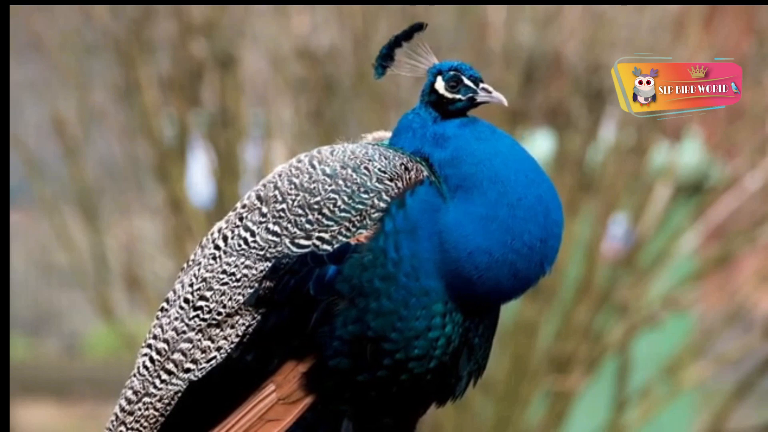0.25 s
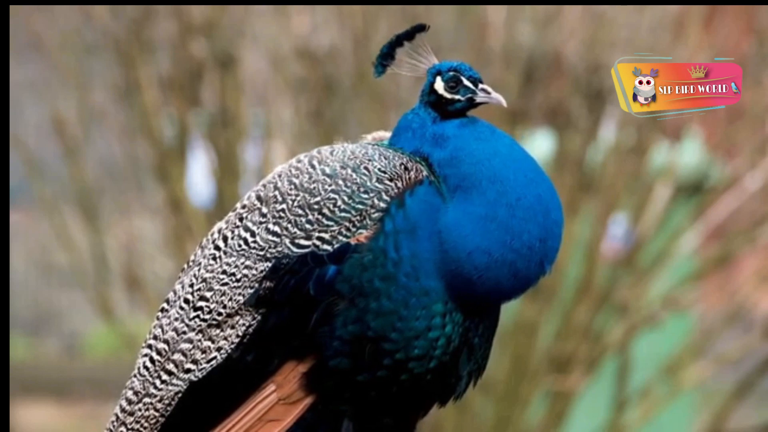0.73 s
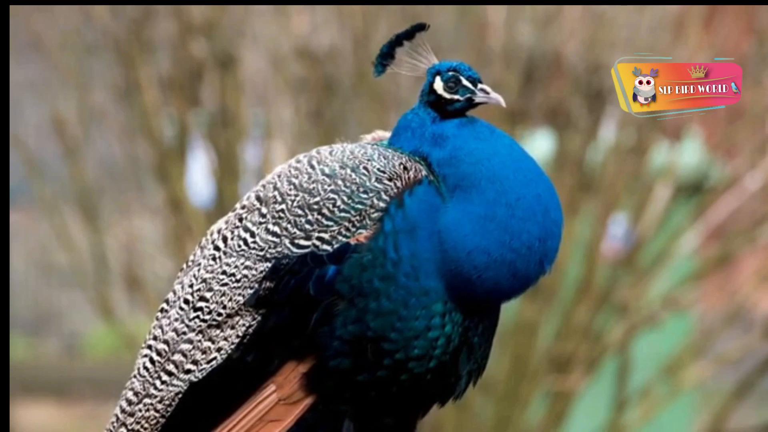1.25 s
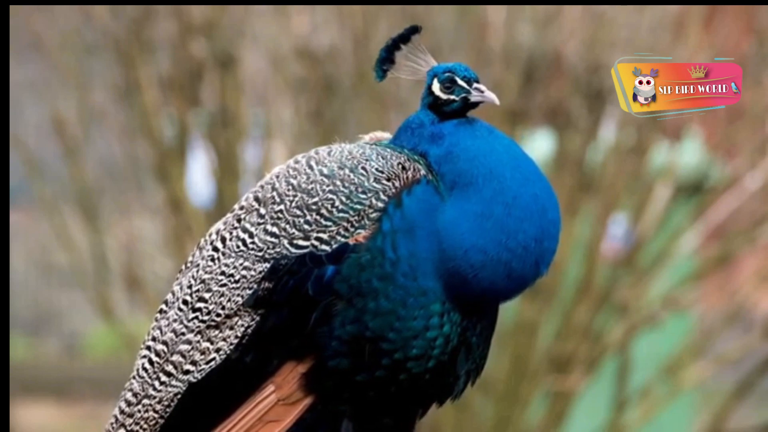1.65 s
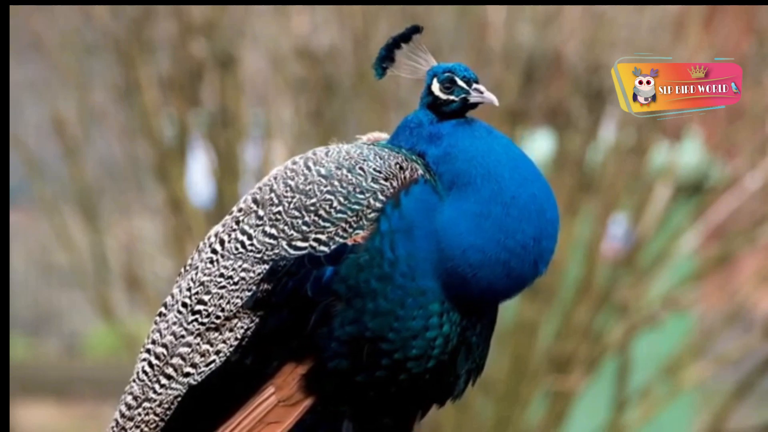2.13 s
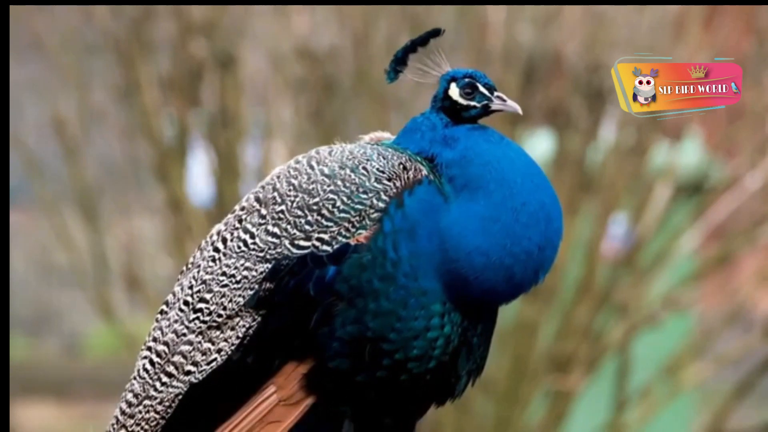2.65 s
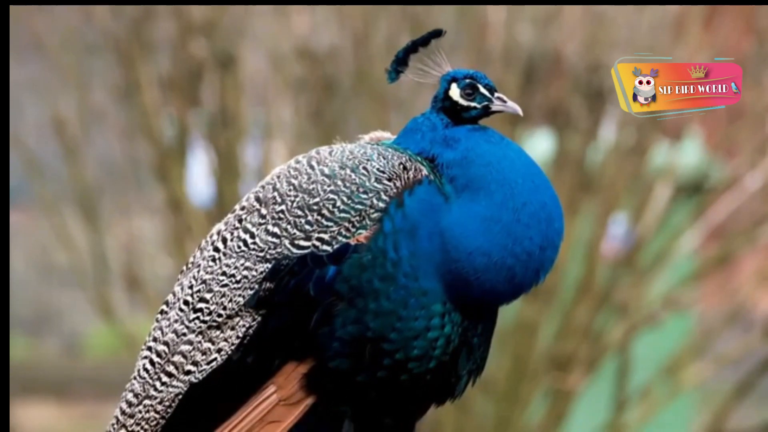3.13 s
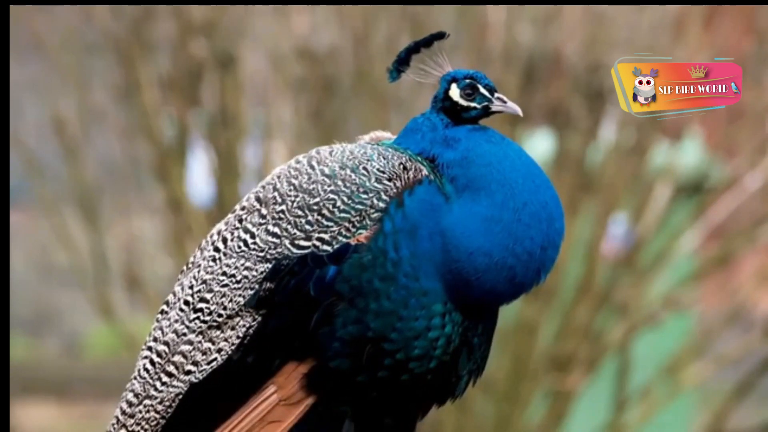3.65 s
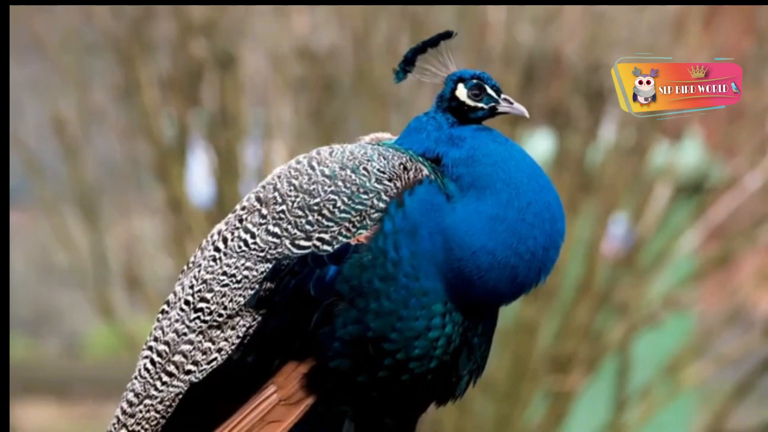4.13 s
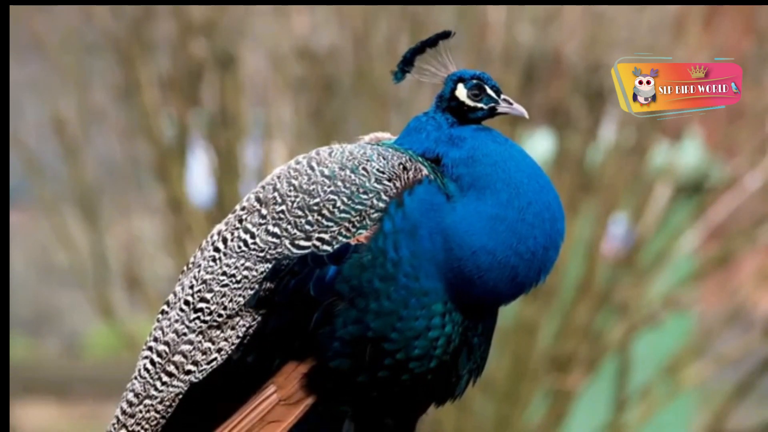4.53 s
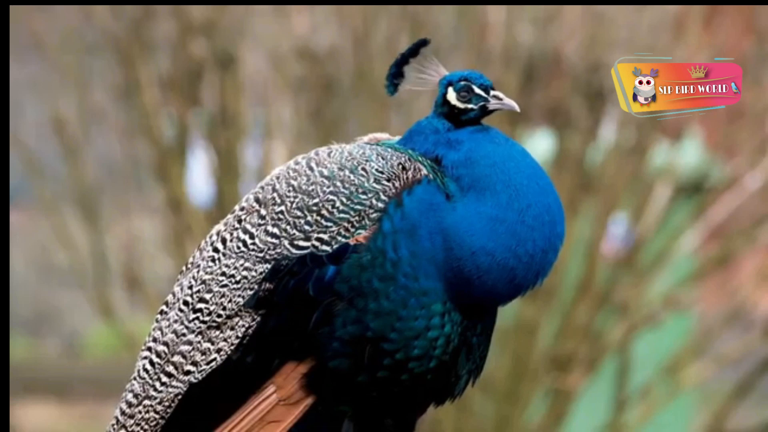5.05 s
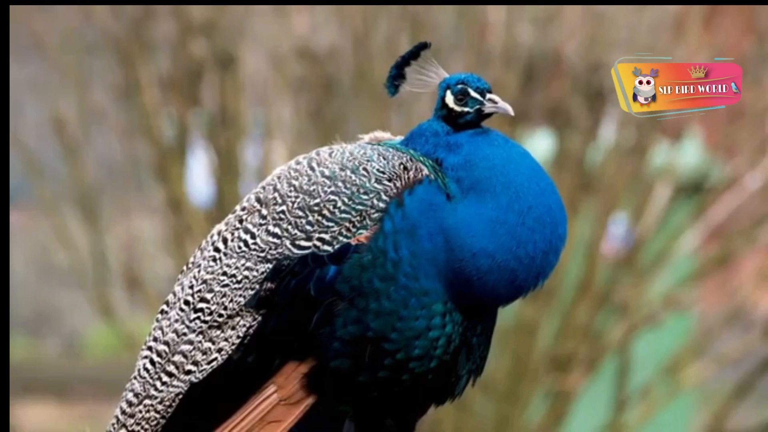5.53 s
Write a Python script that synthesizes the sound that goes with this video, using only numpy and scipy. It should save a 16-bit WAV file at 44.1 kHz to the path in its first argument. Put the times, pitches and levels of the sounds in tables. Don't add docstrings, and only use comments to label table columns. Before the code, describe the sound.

A peacock outdoors wails loudly, gives one short hoarse honk, then wails again, before an abrupt cut to quieter garden air with insects and faint birds.

```python
import sys
import numpy as np
from scipy import signal
from scipy.fft import rfft, irfft, next_fast_len
from scipy.io import wavfile
from scipy.ndimage import uniform_filter1d, map_coordinates

SR = 44100
rng = np.random.default_rng(int(sys.argv[2]) if len(sys.argv) > 2 else 0)


def gain_from_db(level_db):
    decades = np.asarray(level_db, float) / 20
    return 10 ** decades


def wav_out(sig):
    wavfile.write(sys.argv[1], SR, np.round(np.clip(np.atleast_2d(sig).T, -1, 1) * 32767).astype(np.int16))


N = 254898


def unit(x):
    return x / np.sqrt(np.mean(x ** 2) + 1e-20)


def along(points, hz):
    f, value = np.transpose(points)
    return np.interp(np.log(hz + 1), np.log(f + 1), value)


def curves(rows, t):
    s, *columns = np.transpose(rows)
    return [np.interp(t, s, column) for column in columns]


def wobble(rate, count):
    knots = rng.standard_normal(int(count * rate / SR) + 4)
    return map_coordinates(knots, [np.arange(count) * rate / SR])


def filtered(x, response):
    size = next_fast_len(x.shape[-1] + 8192)
    spectrum = rfft(x, size) * response(np.fft.rfftfreq(size, 1 / SR))
    return irfft(spectrum, size)[..., :x.shape[-1]]


def add(mix, s, sound, pan_db=0):
    room = mix[:, round(s * SR):]
    panned = sound * gain_from_db([[pan_db / 2], [-pan_db / 2]])
    room[:, :sound.shape[-1]] += panned[:, :room.shape[1]]


# f/Hz, level/dB
AIR_FIRST = [(20, -24), (60, -4), (150, -8.5), (200, -1), (250, -6), (500, -8.5), (1200, -11.5),
             (2000, -14), (3200, -19), (5500, -13), (8500, -15), (10500, -12.5), (11500, -25), (15200, -32)]
# f/Hz, level/dB
AIR_AFTER = [(20, -28), (60, -4), (200, -4), (700, -4.5), (1700, -8), (2200, -15), (4000, -13), (6000, -12),
             (8500, -5.5), (10300, 0.5), (11200, -24), (13000, -21), (15200, -45.5)]
# t/s, level/dB
AIR_LEVEL = [(0, -53), (1, -52.5), (1.5, -53), (2, -50), (2.3, -54), (2.7, -54.5), (3.1, -58), (3.5, -54),
             (3.93, -56), (3.95, -59), (5.78, -62.5)]
# f/Hz, correlation [0-1]
ALIKE = [(25, .75), (60, .94), (120, .99), (300, .95), (600, .93), (1000, .5), (2000, .15), (15000, .1)]
# f/Hz, left-right level/dB
AIR_PAN = [(300, 0), (1500, -4.5), (3000, 0), (6300, -4.5), (9000, 7), (11500, 4), (14000, -11)]


def air(spectrum):
    def angle(hz):
        return np.arccos(np.clip(along(ALIKE, hz), -1, 1)) / 2

    def mid_side(hz):
        return gain_from_db(along(spectrum, hz)) * [np.cos(angle(hz)), np.sin(angle(hz))]

    def lean(hz):
        return gain_from_db(along(AIR_PAN, hz) * np.array([[.5], [-.5]]))

    mid, side = filtered(rng.standard_normal((2, N)), mid_side)
    pair = filtered(np.array([mid + side, mid - side]), lean)
    level_db = curves(AIR_LEVEL, np.arange(N) / SR)[0] + .8 * wobble(2.4, count=N)
    return gain_from_db(level_db) * unit(pair)


# t/s, level/dB, stroke rate/Hz
CICADA = [(0, -56.5, 146), (1, -57.5, 145), (2.1, -58, 146.9), (2.4, -60, 145), (3.8, -60.5, 145.2),
          (4.24, -59.5, 143.3), (4.27, -75, 139.7), (4.41, -66.5, 141.4), (4.45, -62.5, 147.8),
          (4.7, -59.5, 150.8), (5.2, -60, 145), (5.62, -59.5, 144.7), (5.64, -75, 160), (5.78, -72, 160)]


def cicada():
    db, rate = curves(CICADA, np.arange(N) / SR)
    stroke = np.cumsum(rate) / SR % 1
    shape = np.sin(np.pi * stroke ** 2.0) ** 3.6 * gain_from_db(1.5 * wobble(340, count=N))
    hz = 11100 - 1600 * stroke + 150 * wobble(770, count=N)
    buzz = unit(shape * np.sin(2 * np.pi * np.cumsum(hz) / SR))
    blur = filtered(rng.standard_normal((2, N)), lambda f: 1 / (1 + ((f - 9900) / 600) ** 2) ** 2.0)
    pair = np.array([np.roll(buzz, 5), buzz])
    return gain_from_db(db + [[3.5], [-7]]) * (pair + 0.55 * unit(blur))


# t/s, level/dB
CRICKET = [(0, -65), (1.7, -78), (2.05, -63.5), (2.5, -73.5), (3.94, -73.5), (4.5, -86.5), (5.78, -86.5)]


def cricket():
    t = np.arange(N) / SR
    train = np.clip(3 * np.sin(2 * np.pi * 4.6 * t) + 1.5, 0, 1)
    pulses = np.clip(np.sin(2 * np.pi * 68 * t), 0, 1)
    tone = np.sin(2 * np.pi * 6400 * t + .8 * wobble(197, count=N))
    return gain_from_db(curves(CRICKET, t)[0] + [[-2], [5]]) * unit(train * pulses * tone)


# f/Hz, level/dB
EARLIER = [(1324, -54.5), (1986, -49.5), (3295, -63.5), (3951, -60.5), (5297, -59.5), (5954, -64.5)]


def earlier_call():
    t = np.arange(N) / SR
    return sum(gain_from_db(db + 4.5 - 60 * t / .6) * np.sin(2 * np.pi * f * t) for f, db in EARLIER)


def whistles(rows, pan_db):
    mix = np.zeros((2, N))
    for s, length, from_hz, to_hz, db in rows:
        u = np.linspace(0, 1, round(length * SR))
        hz = from_hz + (to_hz - from_hz) * u
        slide = np.sin(np.pi * u) * np.sin(2 * np.pi * np.cumsum(hz) / SR)
        add(mix, s, gain_from_db(db + 6.5) * slide, pan_db)
    return mix


# t/s, length/s, from f/Hz, to f/Hz, level/dB
FINCHES = [(.03, 0.041, 5680, 4950, -60), (1.162, 0.091, 7240, 7400, -64), (1.906, .044, 3950, 4530, -63),
           (1.93, 0.081, 4410, 5660, -57.5), (3.974, 0.039, 6600, 5800, -66.5),
           (4.158, .034, 7000, 5760, -72), (4.39, .04, 4400, 4430, -78), (4.55, 0.044, 4890, 5000, -80),
           (4.539, .098, 1920, 2150, -80), (4.619, .03, 3600, 3280, -74.5),
           (4.782, 0.053, 4750, 4630, -78.5), (5.65, 0.038, 3510, 3300, -77)]


def finches():
    return whistles(FINCHES, 0)


def glide(t, note, arc):
    start, end, settled_hz, flat_hz, rasp = note
    leap_s, leap_hz, slow, sag_s, sag = arc
    settling = flat_hz * np.exp(-(t - start) / .026)
    since, fast_s = np.clip(t - leap_s, 0, None), .04
    leap = 1 - (1 - slow) * np.exp(-since / fast_s) - slow * np.exp(-since / (4 * fast_s))
    knee = 0.039 * (end - start)
    sagging = sag * knee * np.logaddexp(0, (t - sag_s) / knee)
    pitch = settled_hz - settling + leap_hz * leap - sagging
    calm = 0.018
    locking = rasp * np.exp(-(t - start) / .035)
    slip = .08 * leap_hz / 220 * np.exp(-((t - leap_s - 0.06) / .04) ** 2)
    letting_go = 0.1023 * np.exp((t - end) / .03)
    return pitch, np.clip(calm + locking + slip + letting_go, 0, 1)


def resonances(rows, posture, hz):
    power = sum(gain_from_db(db[posture]) ** 2 / (1 + ((hz - centre) / width) ** 2) ** 1.495
                for centre, width, *db in rows)
    return np.sqrt(power)


# f/Hz, width/Hz, level/dB
BREATH = [
    (1510, 890, -11),
    (3855, 2100, -5.5),
    (6200, 900, -1.5),
    (9100, 1900, 3),
]


def breath(turn, levels):
    puffs = rng.standard_normal(len(turn)) + .3 * rng.standard_normal((2, len(turn)))
    puffs = puffs * (1.1 + np.cos(turn))
    total = 0
    for (hz, width, db), level in zip(BREATH, levels):
        ring = filtered(puffs, lambda f: 1 / (1 + ((f - hz) / width) ** 2) ** 2)
        total = total + level * gain_from_db(db) * unit(ring)
    return total


# f/Hz, width/Hz, level/dB in each call's posture (three columns)
WINDPIPE = [(799.3, 34, -6.5, -12, -24.5), (1638.5, 117.2, -0.17, -0.9, -0.26), (2085, 74, -7, -1.3, -5.5),
            (2513, 78, -7, -16, -10.5)]
# f/Hz, width/Hz, level/dB in each call's posture (three columns)
THROAT = [(3278, 590, -1.74, 0, -9.5), (4365, 130, -10.5, 10.5, -5.5), (4884, 100, -2.2, -0.5, -9),
          (5715, 190, -5, 2, 1.5), (5990, 92, 4, -6.5, -11.5), (6580, 210, 5, 10.5, 4),
          (8270, 480, 4.5, 5.5, -0.9), (9710, 212, -3.5, -3, 4), (10800, 357, -6.5, -13.5, -3.5),
          (11620, 429, -22.5, -26.5, -13), (13228, 580, -33, -33.5, -19.5)]
# f/Hz, left lead/rad
LEAD = [(500, 0), (900, .03), (1500, -.6), (2200, -.35), (3500, -.8), (4400, -.6), (6200, -.3), (8200, -.6),
        (9500, -1.2), (12500, -1.9), (15000, -.5)]


def call(note, arc, effort, posture, facing):
    t = np.arange(note[0], note[1], 1 / SR)
    pitch, hoarse = glide(t, note, arc)
    pitch = uniform_filter1d(pitch, 300)
    effort_db, squeeze_db, opening = curves(effort, t)
    turn = 2 * np.pi * np.cumsum(pitch * (1 + 0.074 * hoarse * wobble(450, count=len(t)))) / SR
    k = np.arange(1, 24)[:, None]
    hz = k * pitch
    upper_db = squeeze_db + opening * np.log2(np.minimum(hz, 11000) / 6000)
    fading = (4.7 + 0.042 * k) * np.array([wobble(13.18, count=len(t)) for _ in k])
    gain = resonances(THROAT, posture, hz) * gain_from_db(effort_db + upper_db + fading) * (hz < 15300)
    gain[:3] = resonances(WINDPIPE, posture, hz[:3]) * gain_from_db(effort_db + 0.37 * fading[:3])
    side = np.array([.5, -.5])[:, None, None]
    phase = k * turn + np.pi / 2 + rng.standard_normal(k.shape) + side * along(LEAD, hz)
    ear = gain_from_db(side * along(facing, hz))
    tone = np.sqrt(2) * np.sum(gain * 2 * ear / ear.sum(0) * np.sin(phase), 1)
    levels = [np.sqrt(np.sum(gain ** 2 / (1 + ((hz - f) / width) ** 2), 0)) for f, width, _ in BREATH]
    noise = breath(turn, levels)
    edge = np.clip(np.minimum(t - t[0], t[-1] - t) / 0.01186, 0, 1)
    return edge * (tone * (1 - .5 * hoarse) + 1.4 * hoarse * noise)


# start t/s, end t/s, settled f/Hz, flat start by f/Hz, hoarseness of the start [0-1]
NOTES = [
    (0.044, 1.008, 624.1, 75.5, 0.14),
    (2.113, 2.309, 707, 130, 0.89),
    (2.607, 3.687, 706.7, 134.5, .05),
]
# break t/s, leap f/Hz, slow share [0-1], sag t/s, sag rate [Hz/s]
ARCS = [
    (0.136, 244, 0.58, .567, 519.4),
    (2.2, 0.5, .3, 2.236, 250.2),
    (2.73, 198, 0.41, 3.168, 481),
]
# t/s, effort level/dB, squeeze of upper partials level/dB, beak opening as tilt [dB/octave]
EFFORT = [
    [(0.045, -24.5, -28.5, -12.5), (0.135, -20, -28.5, -22.5), (0.18, -17, -19, -4.5),
     (0.24, -21, -26.5, -0.5), (0.4, -15, -28, -1.8), (0.55, -14.5, -23.5, -2), (0.7, -20.5, -19, -5.5),
     (0.9, -17.5, -26, -3.5), (1.01, -25, -29, -29.4)],
    [(2.113, -47.5, -19, -10), (2.125, -26.5, -15, -12.5), (2.17, -23, -9, -5), (2.21, -18.5, -15.5, -4.5),
     (2.27, -20, -9.5, -0.5), (2.3, -34, -19.5, -5)],
    [(2.607, -26, -34.5, -19.5), (2.68, -20.5, -18, -12.5), (2.74, -21, -14, -12), (2.79, -21, -11.5, -3),
     (2.92, -11, -28.5, 7), (3.2, -10, -21, 1.9), (3.36, -19.5, -20.5, 2), (3.56, -17.5, -20, -2.4),
     (3.685, -26, -18.5, -20.5)],
]
# f/Hz, left-right level/dB
FACING = [
    [(700, 1), (1500, -6), (2400, -1), (3500, -2.5), (4500, 1), (6000, -8.5), (7200, -1), (8500, 2),
     (9500, 4.5), (11000, 14.5), (12500, 5.5), (15000, 6.5)],
    [(700, 1.5), (1500, -4.5), (2100, -4.5), (3500, 2), (4300, -14), (5500, -1), (6500, -7.5), (8500, -7),
     (9500, 6.5), (11000, 8), (12500, -2), (15000, 1.5)],
    [(700, 1), (1700, -5.5), (2500, -2.5), (3600, 3), (4500, -11), (5500, -5.5), (6800, -6.5), (8200, -5),
     (9800, 6), (10800, 14), (12500, 6), (14000, -8)],
]


def peacock():
    bird = np.zeros((2, N))
    for note, *voice in zip(NOTES, ARCS, EFFORT, range(3), FACING):
        add(bird, note[0], call(note, *voice))
    return bird


# f/Hz, decay t/s
GARDEN = [(500, 1.1), (1000, 3.6), (1700, 2.22), (2300, 1), (3000, 0.76), (6000, 1.8), (10000, 0.38)]
# f/Hz, level/dB
ANSWER = [(500, -29), (900, -26), (1700, -19.5), (2300, -20), (3000, -18), (6000, -23.5), (10000, -30)]
# delay t/s, level/dB
ECHOES = [(0.041, -22), (.09, -32.5), (.2, -34), (.345, -33.5), (0.502, -47.5)]


def garden(bird):
    hz, t, grains = signal.stft(rng.standard_normal((2, 3 * SR // 2)), SR, nperseg=256)
    decay = gain_from_db(-60 * t / along(GARDEN, hz)[:, None])
    decay = decay / np.sqrt(np.sum(decay ** 2, 1, keepdims=True) * 128)
    decay = decay * gain_from_db(along(ANSWER, hz))[:, None]
    tail = signal.istft(grains * decay, SR, nperseg=256)[1]
    tail = np.pad(tail, ((0, 0), (600, 0)))
    walls = np.zeros(tail.shape)
    for s, db in ECHOES:
        add(walls, s, gain_from_db(db) * rng.standard_normal((2, 1500)) * np.hanning(1500) / 12)
    walls = filtered(walls, lambda f: 1 / (1 + ((f - 1500) / 900) ** 2))
    return signal.fftconvolve(bird, tail + walls, axes=1)[:, :N]


# t/s, length/s, from f/Hz, to f/Hz, level/dB
WARBLER = [(1.142, 0.12, 3642, 3755, -58), (1.235, 0.048, 6470, 5300, -62), (1.867, 0.013, 4000, 4190, -62),
           (1.994, .042, 5770, 5700, -56.5), (3.96, .015, 5880, 6650, -65.5),
           (3.983, 0.052, 7450, 6870, -68), (4.091, .018, 6000, 7300, -67.5), (4.128, .04, 7400, 7000, -67),
           (4.249, 0.064, 6910, 5720, -67.5), (4.478, .03, 6900, 6000, -75),
           (4.706, 0.031, 7240, 7000, -75), (5.25, 0.098, 6800, 5100, -69), (5.477, .1, 741, 739, -76)]


def warbler():
    return whistles(WARBLER, -10.5)


# t/s, level/dB, f/Hz
TICKS = [(1.54, -46, 5000), (1.697, -42, 5100), (1.7, -47, 8800), (1.962, -46, 9000), (1.972, -44, 8500),
         (1.982, -45, 9300), (1.992, -46, 8600)]


def twigs():
    mix = np.zeros((2, N))
    t = np.arange(600) / SR
    for s, db, hz in TICKS:
        ring = np.sin(2 * np.pi * hz * t + .7 * wobble(1500, count=len(t)))
        add(mix, s, gain_from_db(db - 60 * t / .018) * ring)
    return mix


CAWS = [4.07, 4.61]
# delay t/s, length/s, f/Hz, level/dB, third partial share
CROW = [
    (0, .25, 596, -68, 0.89),
    (0.211, .13, 734, -67, .1),
]


def crow():
    mix = np.zeros((2, N))
    for s in CAWS:
        for after, length, hz, db, third in CROW:
            u = np.linspace(0, 1, round(length * SR))
            pitch = hz * (1 - 0.096 * u ** 2) * (1 + 0.035 * wobble(197.2, count=len(u)))
            turn = 2 * np.pi * np.cumsum(pitch) / SR
            upper = third * (.5 * np.sin(5 * turn / 2) + np.sin(3 * turn))
            voice = 0.22 * np.sin(turn) + np.sin(2 * turn) + upper
            add(mix, s + after, gain_from_db(db) * np.sin(np.pi * u) ** 0.13 * voice)
    return mix


def scene():
    change_s = 3.942
    first = np.clip((change_s - np.arange(N) / SR) / 0.0033, 0, 1)
    bird = peacock()
    first_take = bird + garden(bird) + earlier_call() + air(AIR_FIRST)
    takes = first * first_take + (1 - first) * air(AIR_AFTER)
    return takes + cicada() + cricket() + finches() + warbler() + twigs() + crow()


def band_limit(x):
    return signal.sosfilt(signal.butter(12, 15850, fs=SR, output="sos"), x)


# f/Hz, width/Hz, level/dB
NOTCHES = [(2590, 135, -25), (7690, 150, -27)]


def record(dry):
    def microphone(f):
        dips_db = sum(db * np.exp(-((f - hz) / width) ** 2) for hz, width, db in NOTCHES)
        return gain_from_db(dips_db) * (f < 15800)

    mix = filtered(dry, microphone)
    return band_limit(mix)


dry = scene()
out = record(dry)
wav_out(out)
```